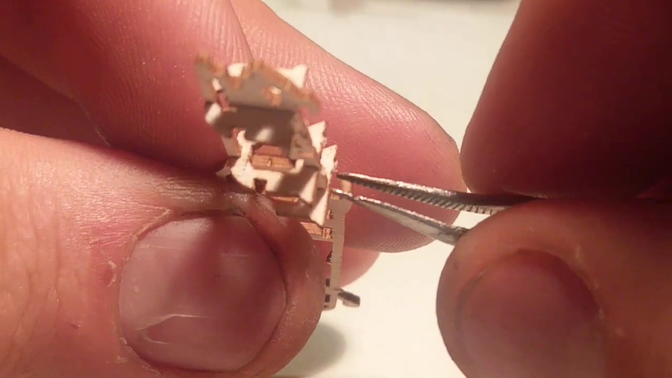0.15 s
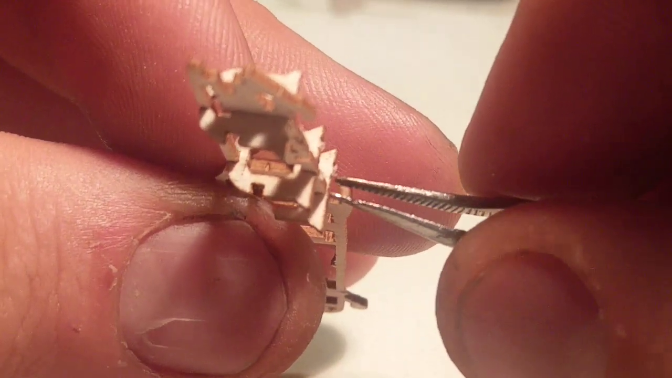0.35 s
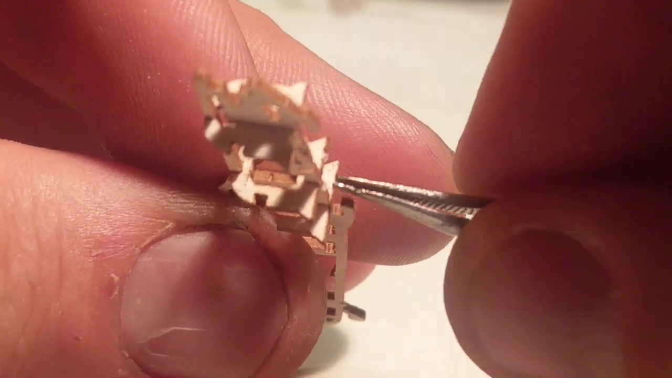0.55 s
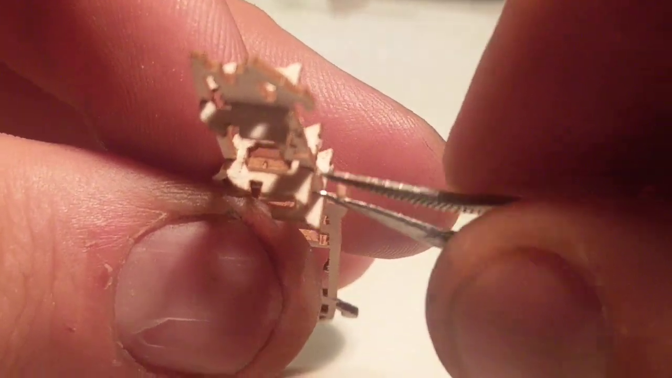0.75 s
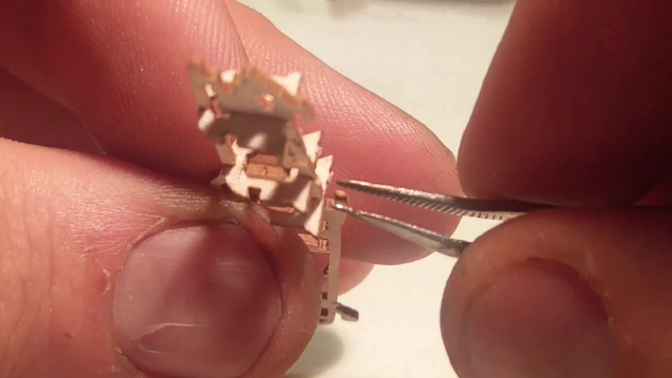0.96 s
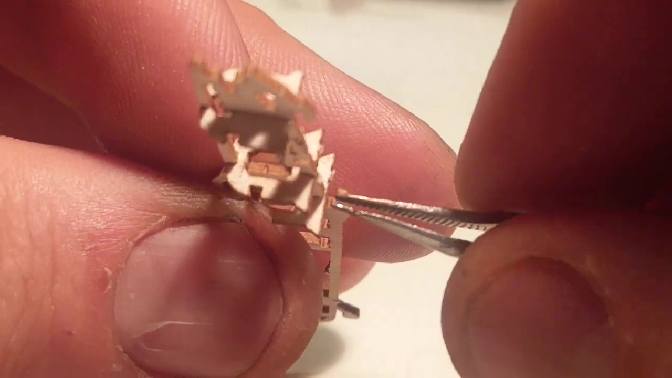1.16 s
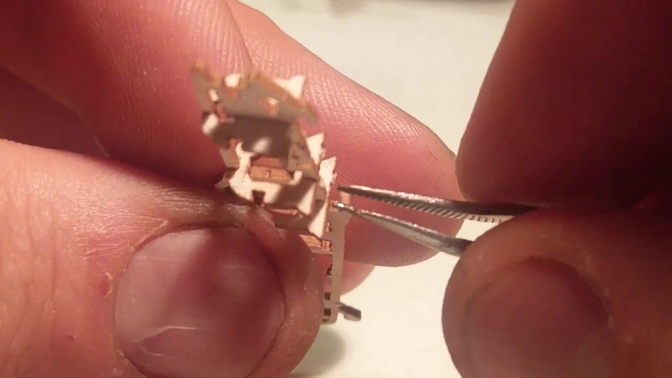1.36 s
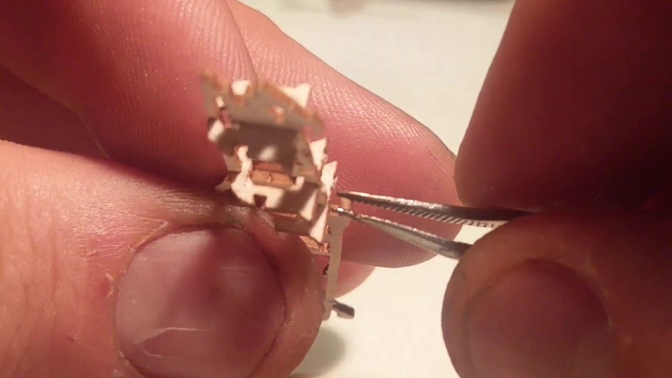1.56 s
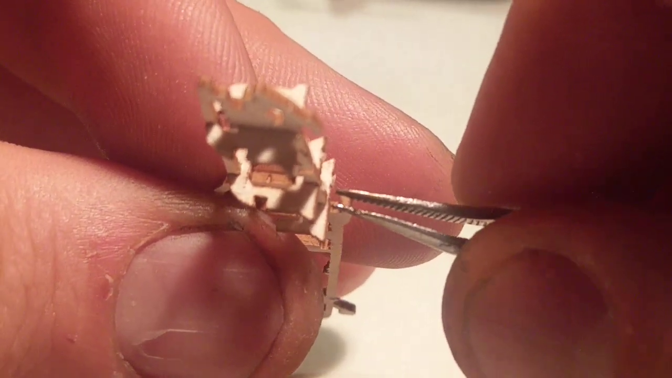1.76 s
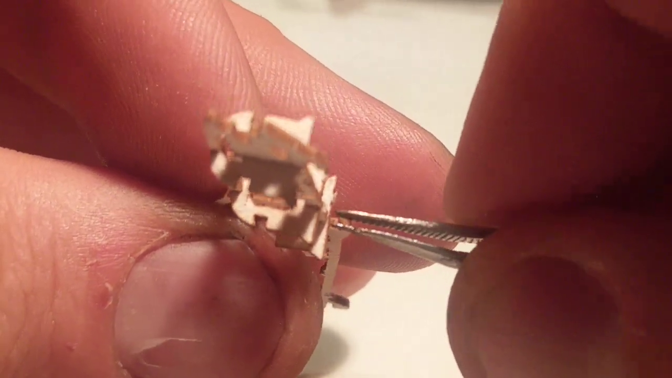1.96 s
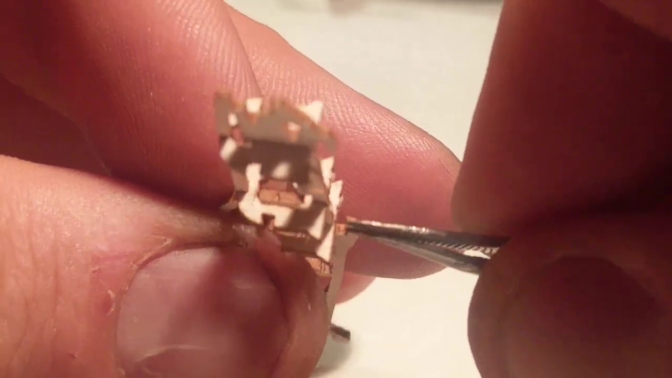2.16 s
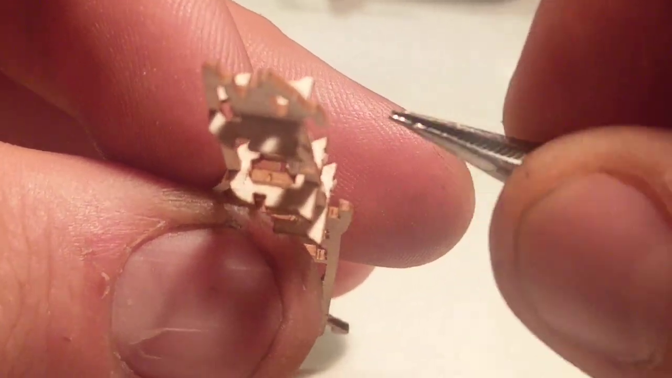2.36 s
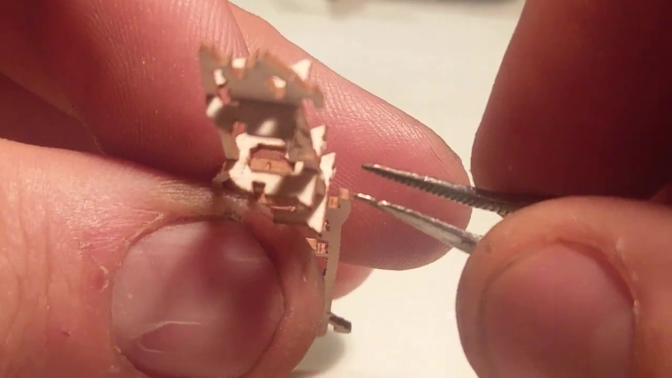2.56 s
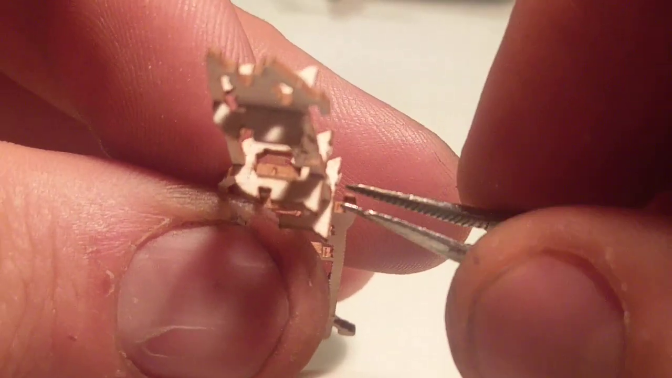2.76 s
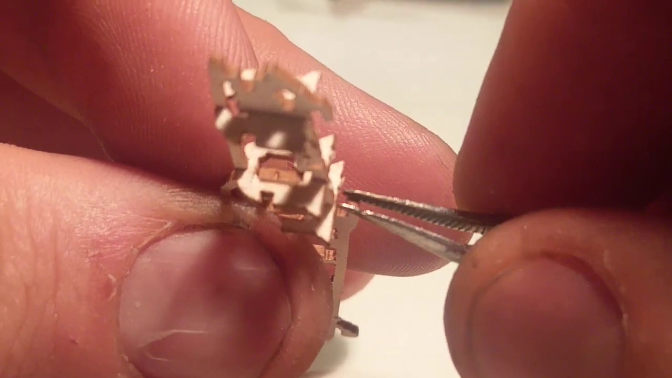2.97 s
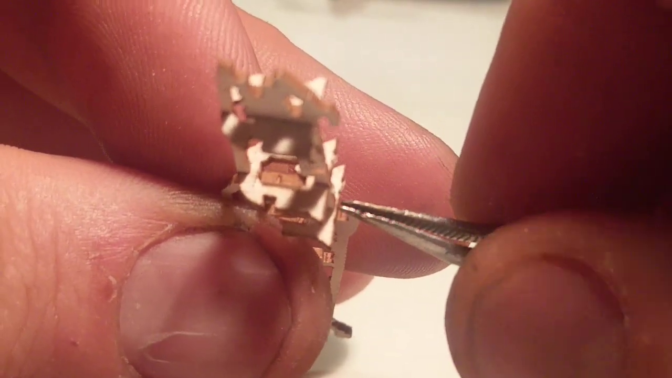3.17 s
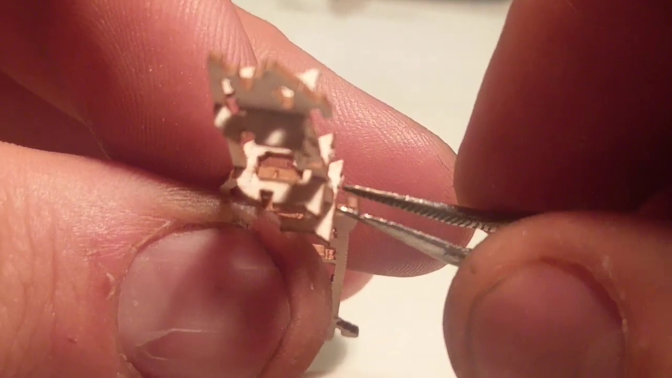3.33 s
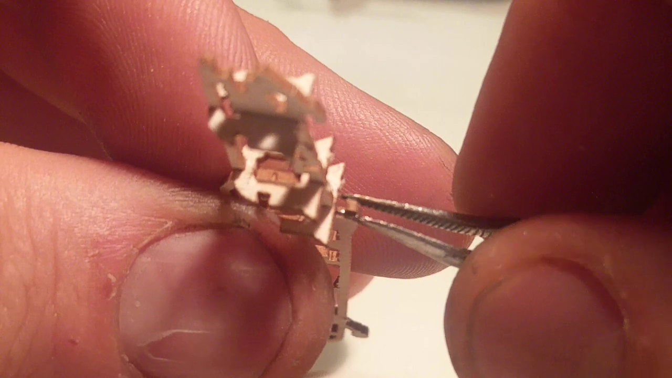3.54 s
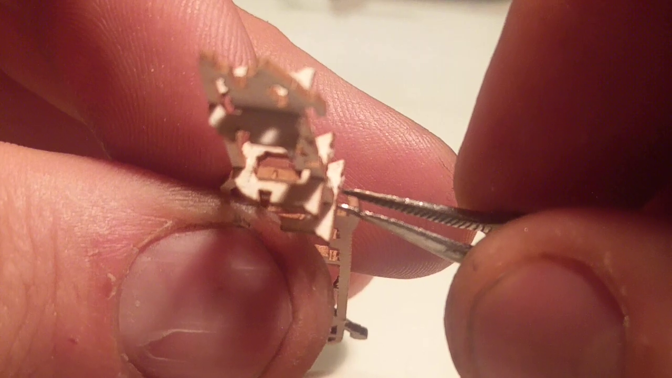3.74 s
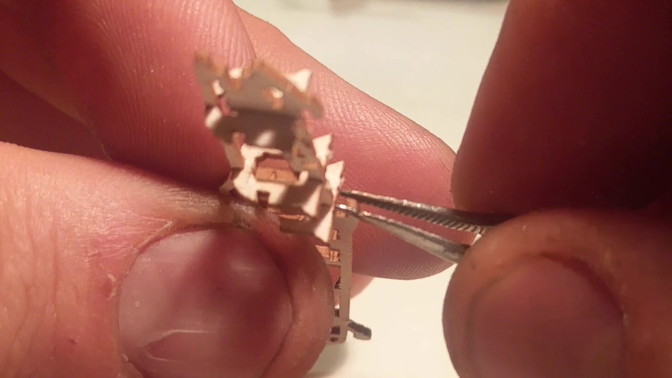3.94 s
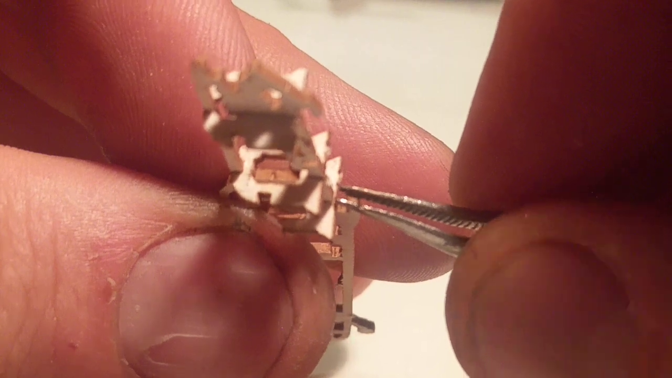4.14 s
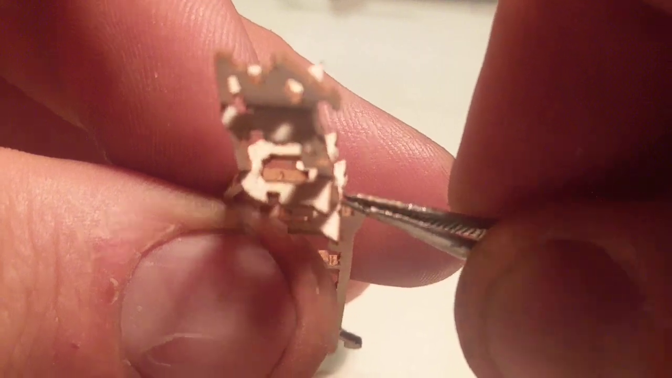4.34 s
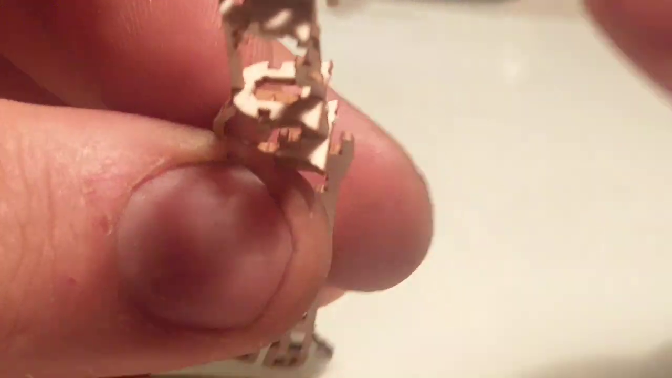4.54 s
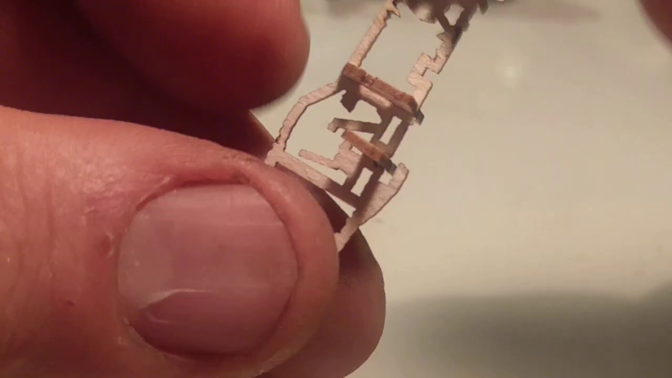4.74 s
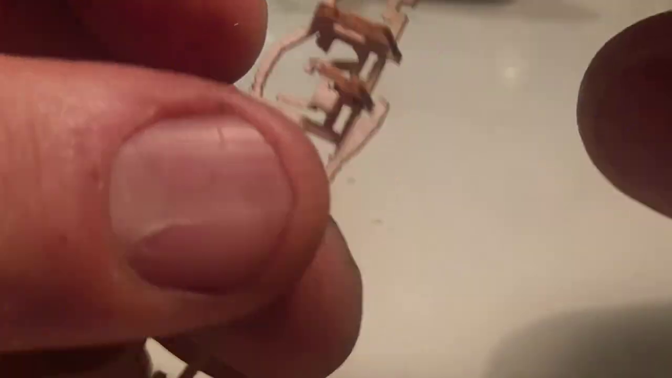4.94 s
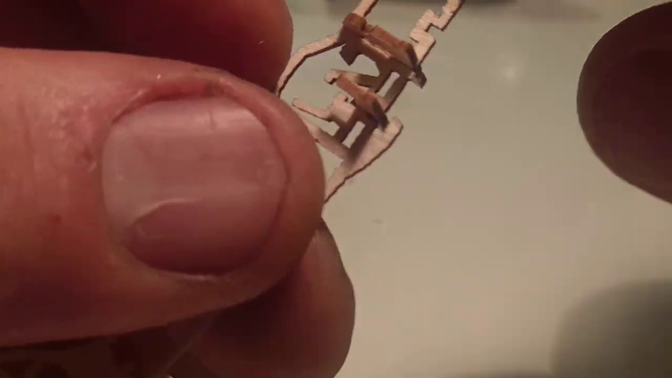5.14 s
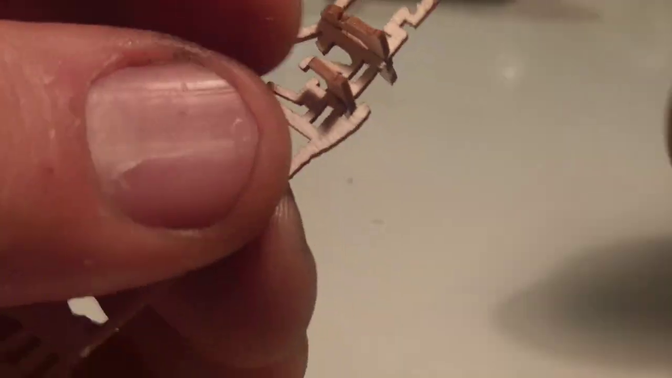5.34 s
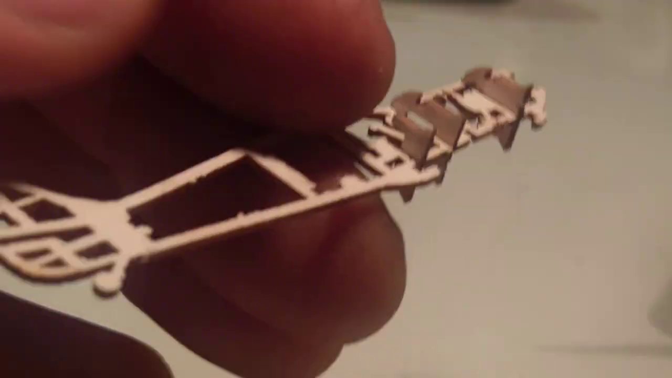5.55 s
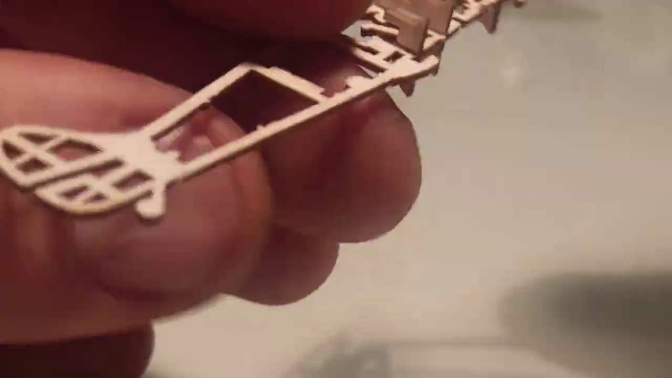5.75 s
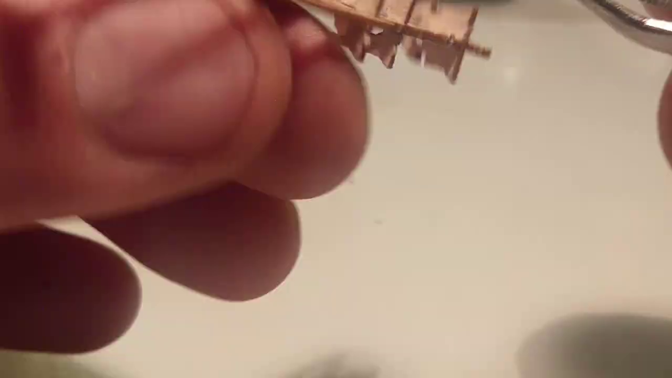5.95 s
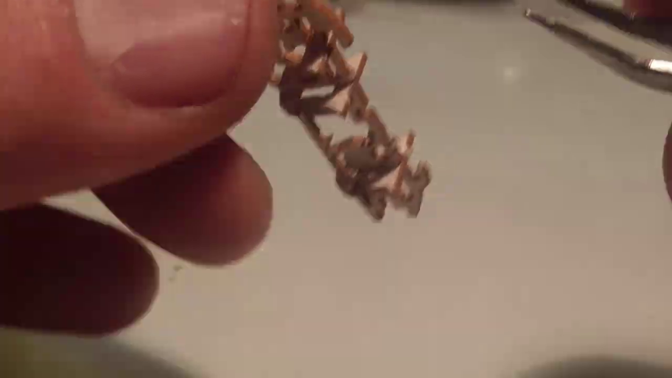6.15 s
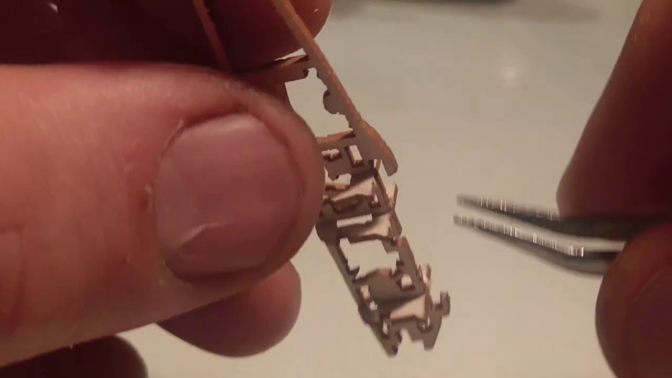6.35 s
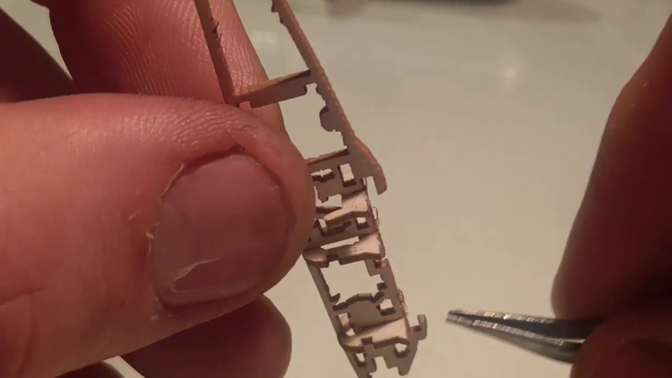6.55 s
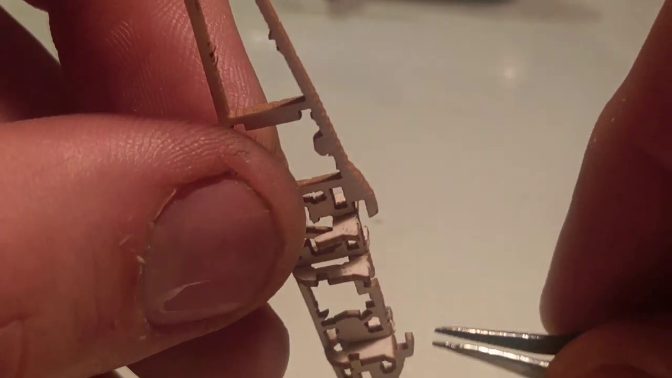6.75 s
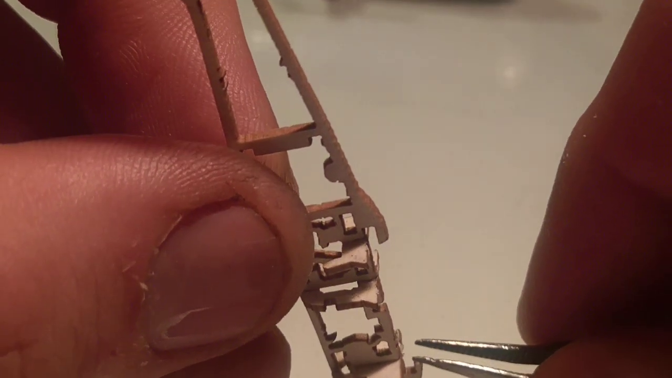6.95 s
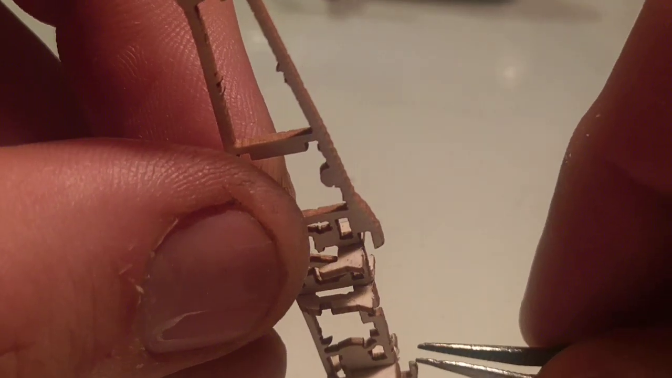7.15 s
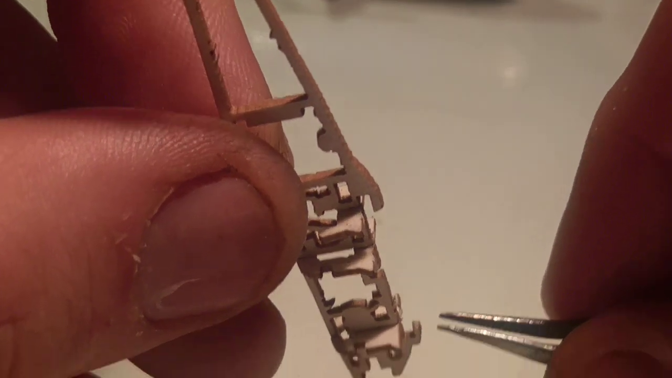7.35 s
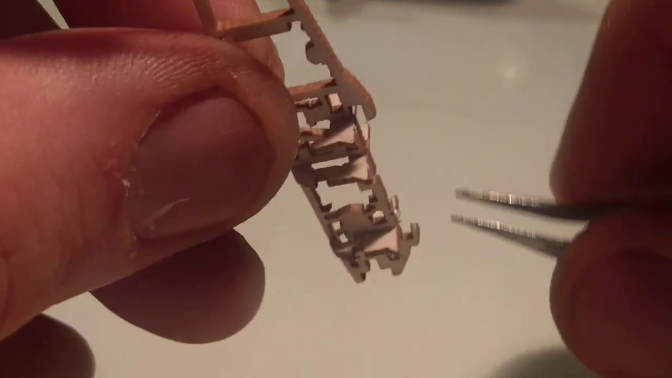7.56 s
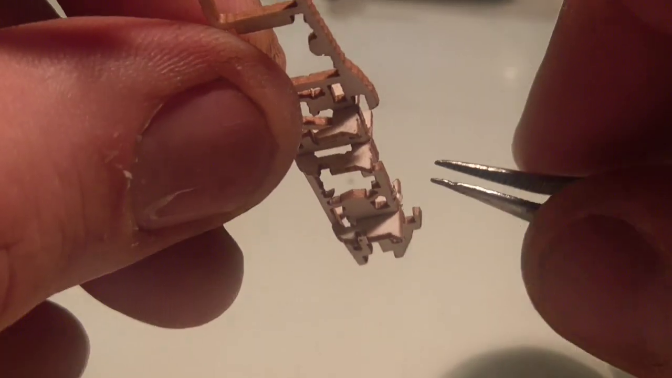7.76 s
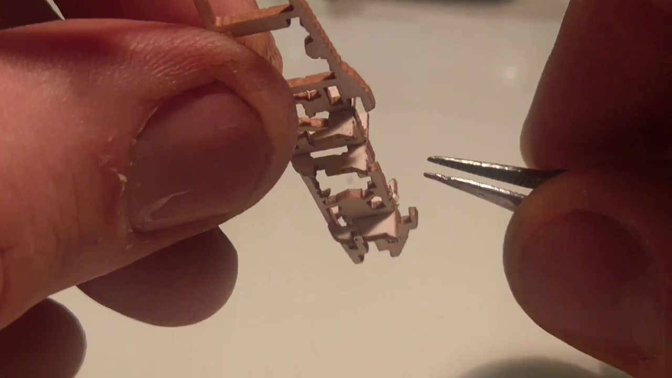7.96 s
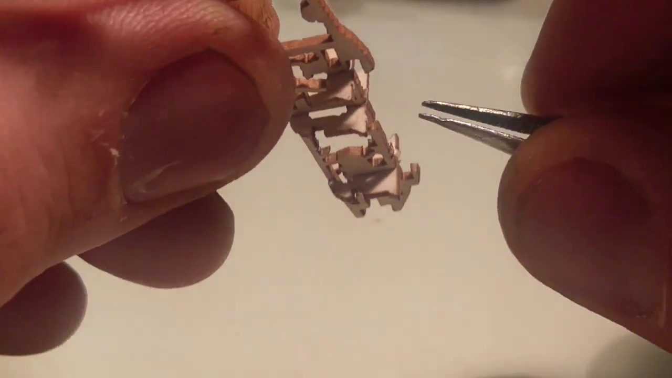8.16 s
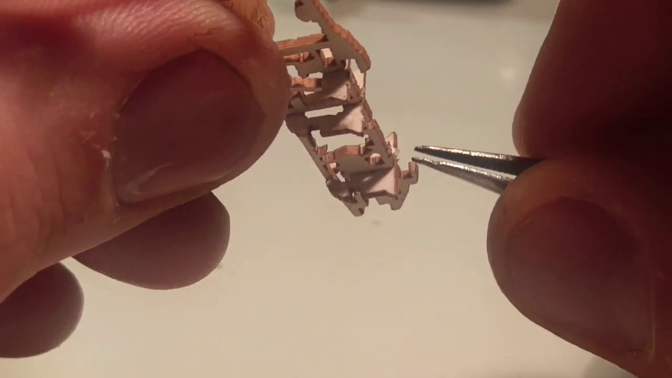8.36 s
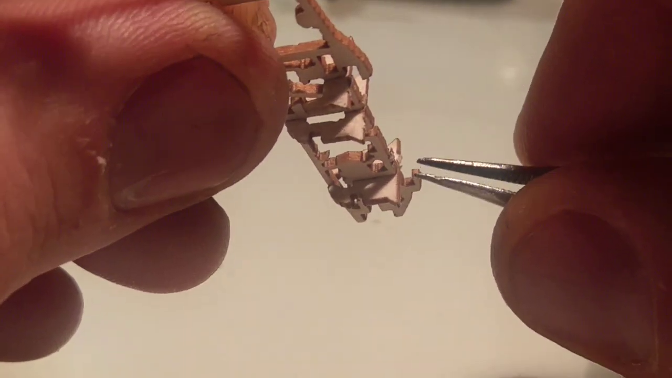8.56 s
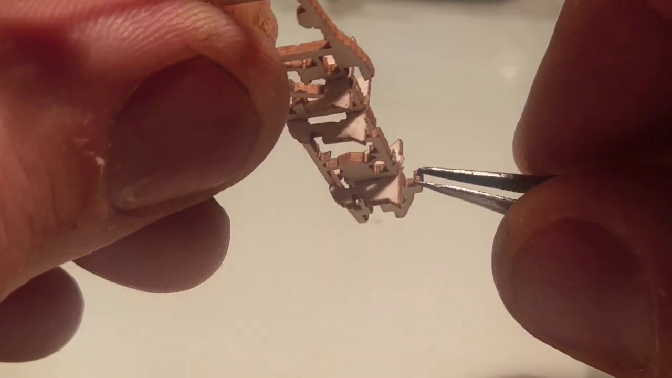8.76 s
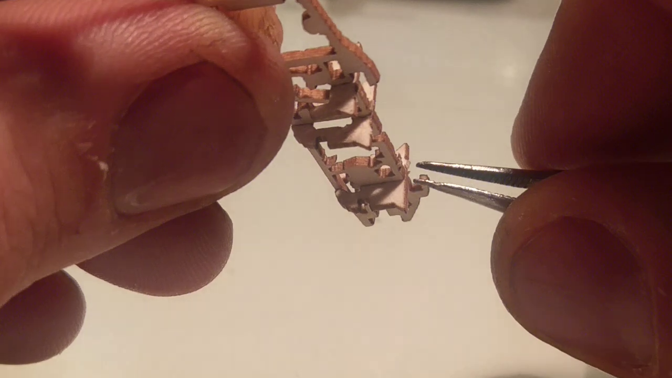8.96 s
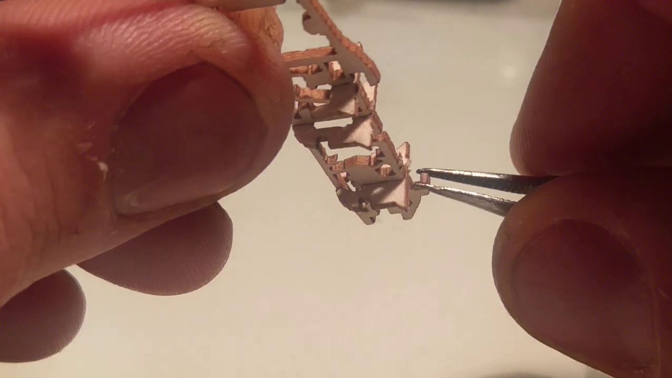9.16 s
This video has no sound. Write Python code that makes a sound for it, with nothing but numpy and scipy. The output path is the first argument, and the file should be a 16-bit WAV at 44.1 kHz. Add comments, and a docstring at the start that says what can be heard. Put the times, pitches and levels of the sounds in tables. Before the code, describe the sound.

Close tweezer tips snap crisply three times, then tiny taps, a soft desk thud and finger rubs, over low room noise and distant birdsong.

```python
"""Appliance hum, low room noise and microphone hiss run throughout: shaped noise and narrow noise bands.
Birds outside are gliding, warbling sines smeared by echoes; a camera ticks faintly, one high resonance.
Steel tweezer tips slip off a thin card part three times near the left port: ringing modes, room echoes.
Taps ring the same modes, a thud is one low resonance, finger rubs are banded grainy noise."""
import sys
import numpy as np
from scipy import signal
from scipy.fft import rfft, irfft, next_fast_len
from scipy.io import wavfile
from scipy.ndimage import uniform_filter1d

SR = 44100
rng = np.random.default_rng(int(sys.argv[2]) if len(sys.argv) > 2 else 0)


def wav_out(sig):
    """Save sig, one row per channel (or a flat mono array), as 16-bit PCM at SR to the path in sys.argv[1]."""
    wavfile.write(sys.argv[1], SR, np.round(np.clip(np.atleast_2d(sig).T, -1, 1) * 32767).astype(np.int16))


N = 405719

# L-R: left minus right. Levels of sources are dry, before any echo.
# appliance hum lines: f/Hz, width/Hz, level/dB rms
HUM_LINES = [(48.8, 5, -73), (119.9, 2, -73), (262, 9.7, -80.5), (327.9, 8, -76.5), (359.8, 8, -78.5),
             (545, 8, -76), (789, 43, -79)]
# spectrum shape of room noise and hiss: f/Hz, relative density/dB
AIR_SPECTRUM = [(12, -39), (20, -10.5), (55, -1), (91, -3), (123, -6), (234, -10), (319, -8.5), (542, -8.5),
                (802, -19.5), (923, -18), (1120, -16), (1610, -22), (7110, -33.5), (13200, -25.5),
                (16000, -31.5)]
# likeness of left and right noise: f/Hz, correlation (0-1, below 0 opposed)
AIR_CORRELATION = [(60, 0.27), (130, 0.2), (290, 0.56), (640, 0.7), (1410, 0), (3100, 0.27), (6820, 0),
                   (15000, -0.09)]
# balance of noise and hum: f/Hz, L-R/dB
AIR_BALANCE = [(60, -7.5), (110, -2.5), (200, -1.5), (380, 0.5), (700, 1.5), (1290, 0.5), (2380, -2.0),
               (4400, -2.5), (8120, 0), (15000, -2.5)]
AIR_RMS_DB = -62.5  # of the mean of both channels

# one bird's repeated falling trill: t/s, level/dB rms, share of full sweep
TRILLS = [(.85, -67, .6), (1.142, -66, 1), (1.466, -67.5, 1), (1.756, -66, 1), (2.105, -66.5, .75),
          (2.476, -67, 1), (2.814, -67, 1), (3.167, -66.5, 1), (3.498, -68, 1)]
TRILL_S, TRILL_CENTRE_HZ, TRILL_SWEEP_HZ, TRILL_WARBLE_HZ, TRILL_PAN_DB = .135, 2640, 720, 240, -3.5
# a song heard twice: t/s, level/dB
SONG_STARTS = [(-.884, 0), (4.736, -3)]
# song notes: t after song start/s, length/s, first f/Hz, last f/Hz, level/dB before song level, warble/Hz
SONG_NOTES = [(0, .06, 4030, 4130, -75, 100), (.091, .063, 4120, 4320, -72, 150),
              (.211, .08, 4200, 3730, -68, 250), (.37, .09, 3800, 3990, -64, 230),
              (.538, .1, 3770, 3970, -63, 230), (.708, .11, 3750, 3910, -63, 230),
              (1.445, .13, 2600, 2480, -71, 60), (1.5, .055, 2600, 3200, -70, 60),
              (1.547, .03, 3200, 4150, -58, 40), (1.59, .06, 3750, 3560, -66, 170),
              (1.685, .085, 3740, 3650, -62, 120), (1.7, .06, 2800, 2800, -70, 80)]
# like chirps within the song: t after song start/s, level/dB before song level
SONG_CHIRPS = [(.89, -67), (1.058, -65.5), (1.232, -65)]
# parts of a chirp: t after chirp start/s, length/s, first f/Hz, last f/Hz, relative level/dB, warble/Hz
CHIRP_PARTS = [(0, .07, 2680, 2850, 0, 110), (.03, .05, 3150, 3150, -9, 50),
               (-.02, .12, 3700, 3520, -5, 200), (-.04, .06, 4550, 4340, -6, 130)]
# song balance by first f of a note: f/Hz, L-R/dB
SONG_BALANCE = [(2700, -7), (3600, -2)]
# clear whistles: t/s, length/s, first f/Hz, last f/Hz, level/dB rms, L-R/dB
WHISTLES = [(6.76, .025, 2250, 2900, -72, -4), (6.778, .1, 2903, 2675, -65.5, -4),
            (7.302, .11, 2767, 2666, -65, -5.5), (7.519, .077, 2070, 2070, -74.5, -2),
            (7.685, .17, 3677, 3470, -59, 4.5), (7.765, .025, 2450, 2870, -66, -3),
            (7.79, .1, 2870, 2830, -67, -3), (8.047, .079, 3910, 3866, -68.5, 1.5),
            (8.099, .14, 2226, 2130, -68, 0), (8.263, .092, 2804, 2670, -65, -4.5),
            (8.271, .177, 3780, 3464, -54, -1.5), (8.632, .077, 3920, 3930, -70.5, -1),
            (8.695, .1, 2072, 2078, -68.5, -1), (8.868, .159, 3590, 3377, -58.5, -2.5)]
# husky calls: t/s, length/s, first f/Hz, last f/Hz, level/dB rms, L-R/dB
RASPS = [(4.26, .09, 3450, 3300, -67, -6), (4.34, .1, 3350, 3200, -75, -1),
         (4.28, .15, 2700, 2880, -74, -3), (6.1, .05, 6000, 5900, -73, 0), (7.08, .1, 3800, 4000, -79, -2),
         (7.248, .045, 3750, 3500, -69, -4)]
WHISTLE_WARBLE_HZ, RASP_WARBLE_HZ = 36, 120
WARBLE_RATE_HZ, GLIDE_EXPONENT, HUSK_SHARE = 64, .6, .7
GARDEN_T60_S, GARDEN_DIRECT_DB = .6, -5  # direct sound relative to echoes

# camera ticks that come early: tick number, from 0
EARLY_TICKS = [0, 14, 15, 16, 17, 19, 21, 23, 25, 28]
TICK_FIRST_S, TICK_PERIOD_S, TICK_EARLY_S = .161, .31998, .008
TICK_MEAN_PEAK_DB, TICK_HZ, TICK_WIDTH_HZ = -54, 10600, 2600

# tips snapping shut: t/s, left peak level/dB, card/dB, shank/dB, thin edge/dB, L-R/dB, sent to walls/dB
SNAPS = [(.474, -8, -20.5, -6, 3.5, 6, -2), (1.9892, .5, -22, 2, -2, 8, 2),
         (4.1467, -3, -17.5, -6.5, 1, 7, -3.5)]
# contacts within one snap: t/ms, mean level/dB
SLIP_CONTACTS = [(0, -7), (.48, 0), (.96, -8), (2.1, -8)]
# finger-held steel modes: f/Hz, width/Hz, relative level/dB
TIP_MODES = [(6140, 260, -18), (6700, 280, -21), (7930, 300, -10), (8560, 280, -8), (9180, 210, -10),
             (10500, 440, 0), (11150, 300, -3), (11650, 300, -9), (12100, 260, -7), (12750, 440, -8),
             (13600, 380, -9), (14200, 360, -17), (15200, 350, -25)]
# card modes: f/Hz, width/Hz, relative level/dB
CARD_MODES = [(1550, 300, 0), (2680, 300, 1), (3730, 280, -5), (4500, 330, -3), (5260, 220, -5)]
# bands of a snap averaged over all directions: f/Hz, width/Hz, relative level/dB
WALL_BANDS = [(5000, 1800, -15), (6473, 970, -10), (8698, 1300, -6), (10800, 2400, 1.5), (13680, 2370, -5)]
SHANK_BELOW_HZ, EDGE_ABOVE_HZ = 9500, 11500
FAR_SHANK_DB, FAR_EDGE_DB = 4, 8  # the hand shadows shanks and edges less than the main ring
CARD_WALL_DB = -5

# light taps on card and desk; the one at 7.255 is likely a bird's chip:
# t/s, peak level/dB, f/Hz, width/Hz, L-R/dB
TAPS = [(.505, -56, 1750, 500, 0), (4.929, -55, 4640, 2000, -5), (5.318, -59, 1900, 1200, 4.5),
        (5.365, -55, 2180, 1500, 0), (5.7075, -35, 11000, 14000, -9), (5.7097, -33, 4600, 3200, -10),
        (5.7235, -47, 12500, 3000, 0), (5.828, -55.5, 1990, 600, -1), (5.99, -58, 5800, 3000, -2),
        (6.03, -55, 1800, 1100, -1.5), (7.255, -52, 3800, 1800, -5)]
TAP_WIDTH_FACTOR, TAP_STEEL_DB = 1.6, 6  # finger damping; steel against card
THUD_S, THUD_PEAK_DB, THUD_HZ, THUD_WIDTH_HZ = 4.539, -42.5, 200, 178  # tweezers laid on the desk

# fingers sliding on card and desk: t/s, length/s, lowest band level/dB rms, brightening/dB per octave
RUBS = [(5.718, .12, -82, 7), (5.943, .1, -87, 9), (7.02, .18, -61.5, .1), (7.9, .24, -64, 1.5)]
# bands the surfaces favour: f/Hz, width/Hz, relative level/dB
RUB_BANDS = [(430, 400, 0), (1620, 160, -11), (2400, 1400, -16), (4500, 3000, -25), (8500, 6000, -34)]

ROOM_T60_S, ROOM_DB, EARLY_T60_S, EARLY_DB = .45, -15, .04, -13
NOTCH_HZ, NOTCH_WIDTH_HZ, NOTCH_DEPTH = 7150, 450, .8  # depth: share removed at centre
OFFSET, CUTOFF_HZ = .001, 15720


def undb(db):
    """dB to amplitude ratio."""
    return 10 ** (np.asarray(db) / 20)


def unit(x):
    """Scale each channel to energy 1."""
    return x / np.sqrt(np.sum(x ** 2, axis=-1, keepdims=True))


def pan(db):
    """Left and right gains whose ratio is db."""
    return undb(np.array([[db], [-db]]) / 2)


def add(out, s, x):
    """Mix x in at s seconds."""
    i = int(s * SR)
    out[..., i:i + x.shape[-1]] += x[..., :out.shape[-1] - i]


def band(x, lo_hz, hi_hz):
    """Gentle band-pass."""
    return signal.sosfilt(signal.butter(2, [lo_hz, hi_hz], "bandpass", fs=SR, output="sos"), x)


def ring(modes, phases):
    """Sum of decaying sines; a wide mode decays faster and starts higher for the same spectral top."""
    t = np.arange(SR // 25) / SR
    total = 0
    for (hz, width, db), phase in zip(modes, phases):
        decay = np.exp(-np.pi * width * t)
        total = total + undb(db) * width * decay * np.sin(2 * np.pi * hz * t + phase)
    return total


def knock(hz, width):
    """One resonance passed twice: steep flanks."""
    once = ring([(hz, width, 0)], [0])
    return np.convolve(once, once)


def tail(t60_s):
    """Diffuse echoes: decaying noise, unrelated at the two ports, energy 1."""
    t = np.arange(int(t60_s * SR)) / SR
    onset = np.minimum(t / 0.0036, 1)
    return unit(rng.standard_normal((2, len(t))) * undb(-60 * t / t60_s) * onset)


def convolve(x, response):
    """Pass x through an echo response, cut to N samples."""
    return signal.fftconvolve(x, response, axes=1)[:, :N]


def walk(rate_hz):
    """Random levels held 1 / rate_hz s and slewed twice; spread near 1."""
    k = int(SR / rate_hz)
    held = np.repeat(rng.standard_normal(N // k + 1), k)
    return 1.1 * uniform_filter1d(uniform_filter1d(held, k), k)[:N]


def at_log(f_hz, table):
    """Table level at each frequency, straight lines over log frequency."""
    points = np.array(table)
    return np.interp(np.log(f_hz), np.log(points[:, 0]), points[:, 1])


def room_noise(n, f_hz):
    """Coloured noise, correlated by band; its low part swells slowly, its high part flickers."""
    alike = np.clip(at_log(f_hz, AIR_CORRELATION), -.9, .95)
    mid, side = rfft(rng.standard_normal((2, n))) * np.sqrt([1 + alike, 1 - alike])
    colour = undb(at_log(f_hz, AIR_SPECTRUM)) * pan(at_log(f_hz, AIR_BALANCE)).reshape(2, -1)
    both = np.array([mid + side, mid - side]) * colour
    low_share = 1 / (1 + (f_hz / 900) ** 2)
    low = irfft(both * low_share, n)[:, :N] * undb(0.42 * walk(1.5) + 0.76 * walk(8))
    high = irfft(both * (1 - low_share), n)[:, :N] * undb(0.55 * walk(14))
    noise = low + high
    return noise * undb(AIR_RMS_DB) / np.sqrt(np.mean(noise.mean(0) ** 2))


def appliance_hum(n, f_hz):
    """Noise in narrow resonances: wavering lines, mostly the same at both ports."""
    lines = sum(undb(db) * unit(1 / (1 + (2 * (f_hz - hz) / w) ** 2)) for hz, w, db in HUM_LINES)
    mid, side = rfft(rng.standard_normal((2, n))) * lines * np.sqrt(n / 2)
    both = np.array([mid + .5 * side, mid - .5 * side])
    return irfft(both * pan(at_log(f_hz, AIR_BALANCE)).reshape(2, -1), n)[:, :N]


def air():
    """Room noise and hiss plus hum, both shaped in the frequency domain."""
    n = next_fast_len(N)
    f_hz = np.maximum(np.fft.rfftfreq(n, 1 / SR), 1)
    return room_noise(n, f_hz) + appliance_hum(n, f_hz)


def bird_notes():
    """All notes as (t/s, length/s, first f/Hz, last f/Hz, level/dB, warble/Hz, L-R/dB)."""
    notes = []
    for s, db, share in TRILLS:
        half_hz = share * TRILL_SWEEP_HZ / 2
        notes.append((s, TRILL_S, TRILL_CENTRE_HZ + half_hz, TRILL_CENTRE_HZ - half_hz, db,
                      share * TRILL_WARBLE_HZ, TRILL_PAN_DB))
    song = list(SONG_NOTES)
    for s, db in SONG_CHIRPS:
        for delay_s, length_s, hz0, hz1, part_db, warble_hz in CHIRP_PARTS:
            song.append((s + delay_s, length_s, hz0, hz1, db + part_db, warble_hz))
    for start_s, song_db in SONG_STARTS:
        for s, length_s, hz0, hz1, db, warble_hz in song:
            pan_db = np.interp(hz0, *np.array(SONG_BALANCE).T)
            notes.append((start_s + s, length_s, hz0, hz1, db + song_db, warble_hz, pan_db))
    for calls, warble_hz in [(WHISTLES, WHISTLE_WARBLE_HZ), (RASPS, RASP_WARBLE_HZ)]:
        for s, length_s, hz0, hz1, db, pan_db in calls:
            notes.append((s, length_s, hz0, hz1, db, warble_hz, pan_db))
    return notes


def birds():
    """Near sines that glide and unevenly warble, smeared by garden walls and the window."""
    out = np.zeros((2, N + SR))  # starts 1 s early
    husk = walk(150)
    for s, length_s, hz0, hz1, db, warble_hz, pan_db in bird_notes():
        t = np.arange(int(length_s * SR)) / SR
        glide_hz = hz0 + (hz1 - hz0) * (t / length_s) ** GLIDE_EXPONENT
        # the random part makes the note husky
        uneven = HUSK_SHARE * husk[int(abs(s) * SR):][:len(t)]
        hz = glide_hz + warble_hz * (np.sin(2 * np.pi * WARBLE_RATE_HZ * t) + uneven)
        shape = np.clip(np.minimum(t / (0.2 * length_s), (length_s - t) / 0.025), 0, 1)
        note = np.sqrt(2) * undb(db) * shape * np.sin(2 * np.pi * np.cumsum(hz) / SR)
        add(out, s + 1, note * pan(pan_db))
    echoes = signal.fftconvolve(out, tail(GARDEN_T60_S), axes=1)[:, :N + SR]
    return (undb(GARDEN_DIRECT_DB) * out + echoes)[:, SR:]


def camera_ticks():
    """A steady, short, high resonance inside the camera, right channel only; listed ticks come early."""
    out, tick = np.zeros((2, N)), knock(TICK_HZ, TICK_WIDTH_HZ)
    k = np.arange(int((N / SR - TICK_FIRST_S) / TICK_PERIOD_S) + 1)
    times_s = TICK_FIRST_S + k * TICK_PERIOD_S - TICK_EARLY_S * np.isin(k, EARLY_TICKS)
    for s, db in zip(times_s, rng.standard_normal(len(k))):
        add(out[1], s, tick * undb(TICK_MEAN_PEAK_DB + db) / np.abs(tick).max())
    return out


def gripped(modes, shank_db, edge_db):
    """The grip decides how much the long shanks and the thin edges ring."""
    return [(hz, w, db + shank_db * (hz < SHANK_BELOW_HZ) + edge_db * (hz > EDGE_ABOVE_HZ))
            for hz, w, db in modes]


def snap_tips(contacts, shank_db, edge_db):
    """Contacts ring the steel; the far port, behind the hand, hears other mode levels and phases."""
    near_modes = gripped(TIP_MODES, shank_db, edge_db)
    far_modes = gripped(TIP_MODES, shank_db + FAR_SHANK_DB, edge_db + FAR_EDGE_DB)
    phases = rng.uniform(0, 1, (2, len(TIP_MODES))) * [[1.2], [np.pi]]
    rings = [np.convolve(contacts, ring(m, p)) for m, p in zip((near_modes, far_modes), phases)]
    return unit(band(rings, 6200, 15500))


def wall_click(shank_db, edge_db):
    """Mean over all directions, in which single modes blur into bands that add by power."""
    power = 0
    for hz, width, db in gripped(WALL_BANDS, shank_db, edge_db):
        power = power + np.abs(rfft(undb(db) * unit(knock(hz, width)))) ** 2
    # centred 3 ms late to keep both halves of the click
    click = np.roll(irfft(np.sqrt(power)), int(.003 * SR))[:int(.006 * SR)]
    return unit(click)


def snaps():
    """A few quick contacts ring tips and card; returns the sound at the ports and that sent to the walls."""
    out, to_walls = np.zeros((2, N)), np.zeros((1, N))
    for s, db, card_db, shank_db, edge_db, pan_db, wall_db in SNAPS:
        contacts = np.zeros(SR // 200)
        for ms, contact_db in SLIP_CONTACTS:
            contacts[int(ms * SR / 1000)] = undb(contact_db + rng.standard_normal())
        tips = snap_tips(contacts, shank_db, edge_db)
        card = np.convolve(contacts ** 2, ring(CARD_MODES, np.zeros(len(CARD_MODES))))
        # so small a part sends out no bass
        card = undb(card_db) * unit(band(card, 700, 6000))
        snap = tips * pan(pan_db) + card * pan(0.3 * pan_db)
        snap[1] = np.roll(snap[1], int(.0001 * SR))  # the far port hears it later
        gain = undb(db) / np.abs(snap[0]).max()
        add(out, s, gain * snap)
        add(to_walls, s, gain * undb(wall_db) * wall_click(shank_db, edge_db))
        add(to_walls, s, gain * undb(CARD_WALL_DB) * card)
    return out, to_walls


def taps():
    """A touch rings card and steel, damped by fingers; the spot favours one band. Also the desk thud."""
    out = np.zeros((2, N))
    steel = [(hz, w, db + TAP_STEEL_DB) for hz, w, db in TIP_MODES]
    modes = [(hz, TAP_WIDTH_FACTOR * w, db) for hz, w, db in list(CARD_MODES) + steel]
    for s, db, hz, width, pan_db in TAPS:
        rung = ring(modes, rng.uniform(0, 2, len(modes)))
        tap = band(np.convolve(rung, knock(hz, width)), 1200, 16000)
        add(out, s, tap * undb(db) / np.abs(tap).max() * pan(pan_db))
    thud = knock(THUD_HZ, THUD_WIDTH_HZ)
    add(out, THUD_S, thud * undb(THUD_PEAK_DB) / np.abs(thud).max())
    return out


def rubs():
    """Grainy noise in the bands the surfaces favour, swelling and fading; a quick slide is brighter."""
    out = np.zeros((2, N))
    for s, length_s, db, tilt_db in RUBS:
        n = int(length_s * SR)
        swell = np.sqrt(np.hanning(n))
        for hz, width, band_db in RUB_BANDS:
            grain_db = 2.2 * np.repeat(rng.standard_normal(n // 200 + 1), 200)[:n]
            grain = rng.standard_normal((2, n)) * undb(grain_db)
            octaves = np.log2(hz / RUB_BANDS[0][0])
            gain = undb(db + band_db + tilt_db * octaves)
            rub = unit(band(grain, hz - width / 2, hz + width / 2)) * np.sqrt(2 * n)
            add(out, s, rub * swell * gain)
    return out


def room(near, to_walls):
    """Early echoes of the near sound, then the furnished room's diffuse decay."""
    early = undb(EARLY_DB) * convolve(near, tail(EARLY_T60_S))
    return early + undb(ROOM_DB) * convolve(to_walls, tail(ROOM_T60_S))


def mic_notch(x):
    """The microphone's response dips in one narrow band."""
    b, a = signal.iirpeak(NOTCH_HZ, NOTCH_HZ / NOTCH_WIDTH_HZ, fs=SR)
    return x - NOTCH_DEPTH * signal.lfilter(b, a, x)


def scene():
    """Sum of all sources; snaps, taps and thud get room echoes and the microphone notch."""
    background = air() + birds() + camera_ticks()
    snap, to_walls = snaps()
    tap = taps()
    near = snap + tap
    desk = mic_notch(near + room(near, to_walls + tap[:1]))
    return background + desk + rubs()


def record(dry):
    """The converter sits slightly off zero and cuts the top."""
    return signal.sosfilt(signal.ellip(10, .2, 70, CUTOFF_HZ, fs=SR, output="sos"), dry) + OFFSET


dry = scene()
out = record(dry)
wav_out(out)
```